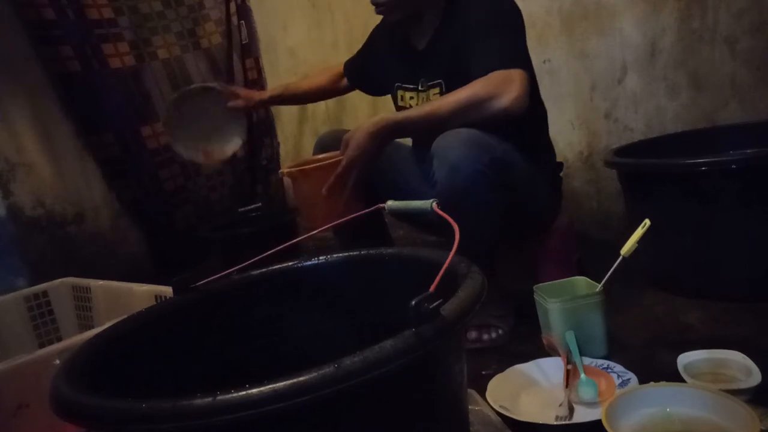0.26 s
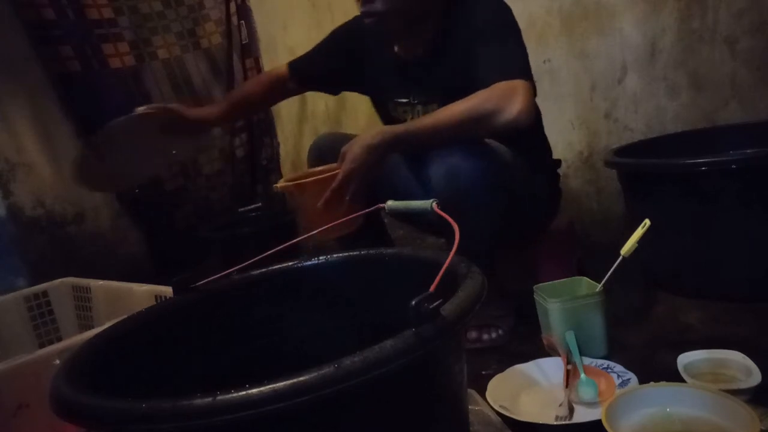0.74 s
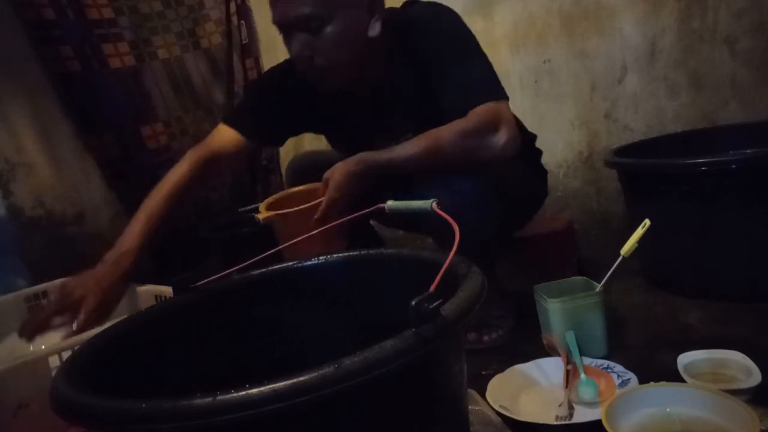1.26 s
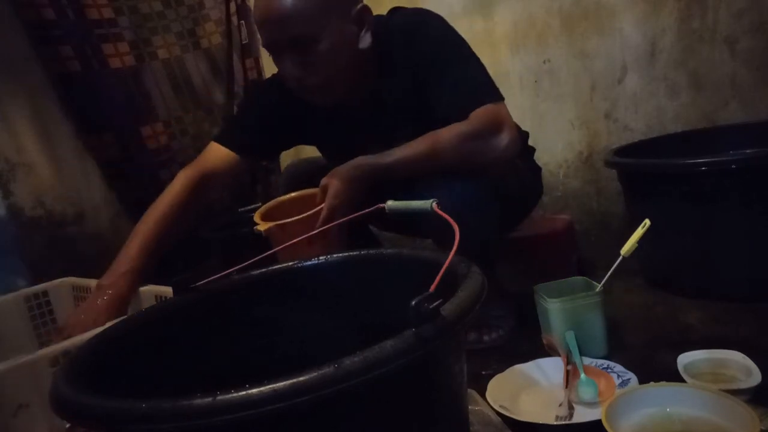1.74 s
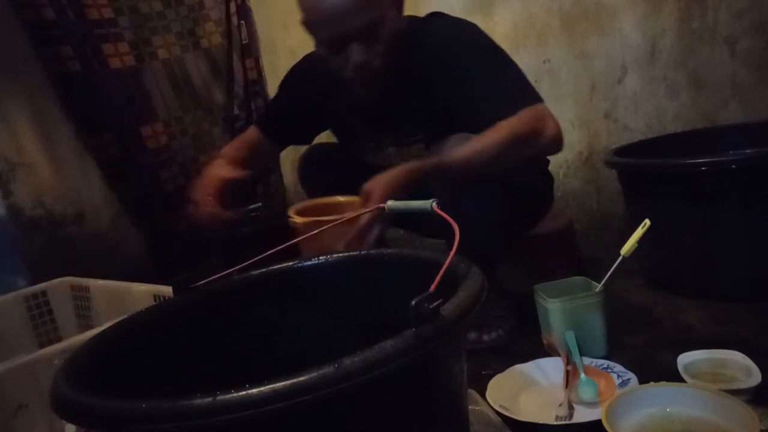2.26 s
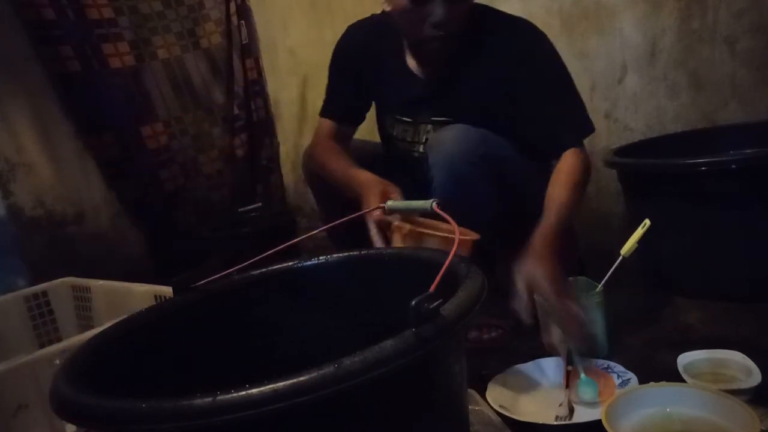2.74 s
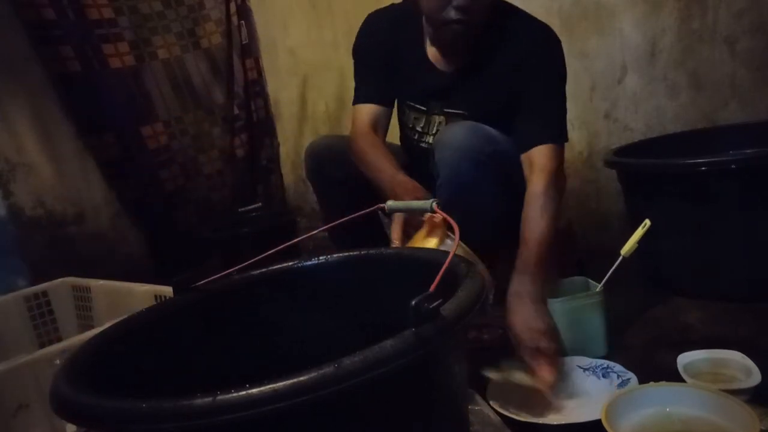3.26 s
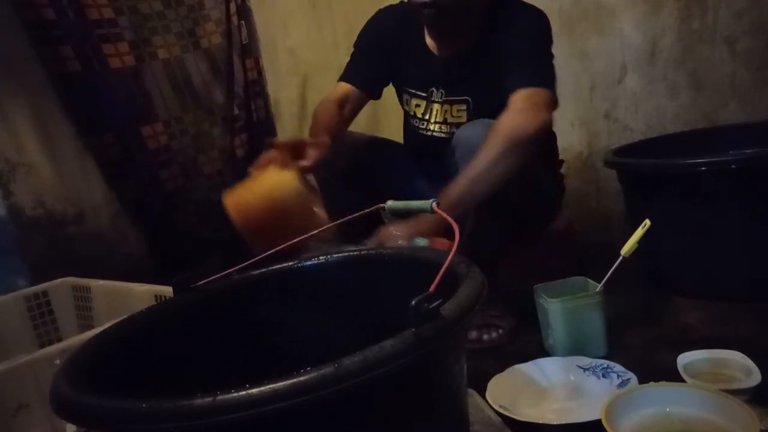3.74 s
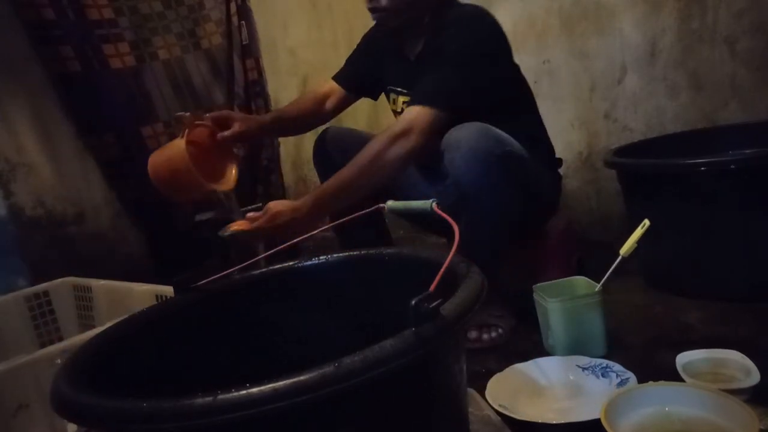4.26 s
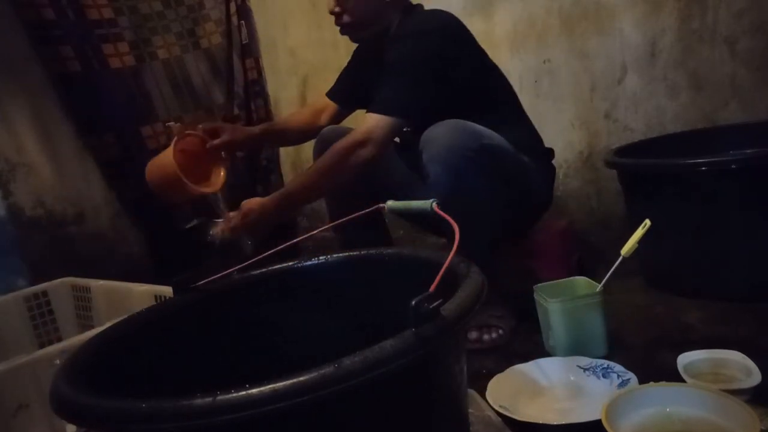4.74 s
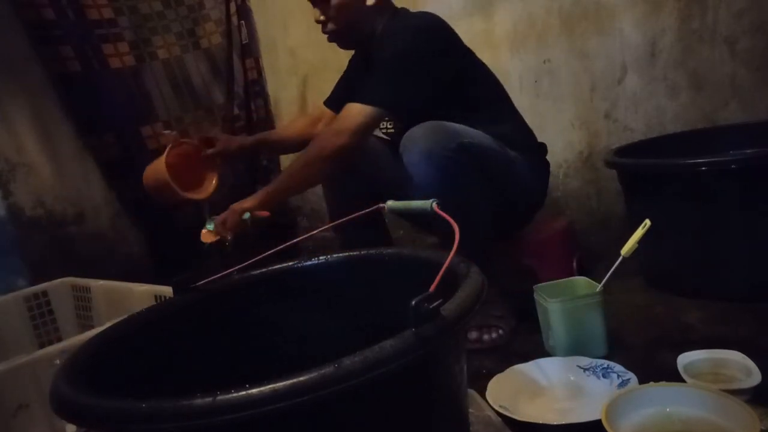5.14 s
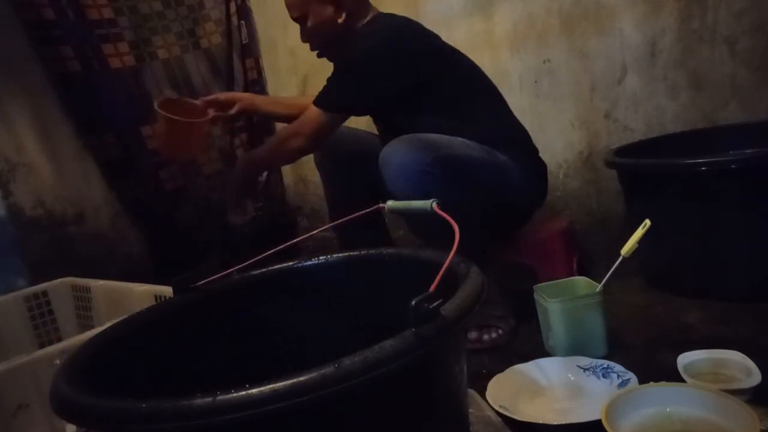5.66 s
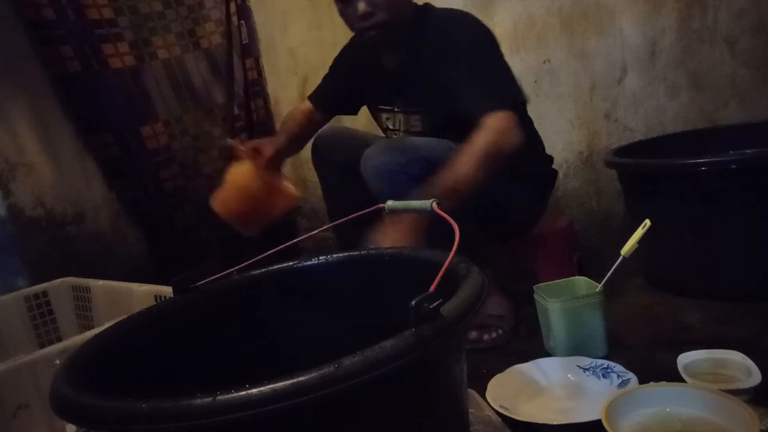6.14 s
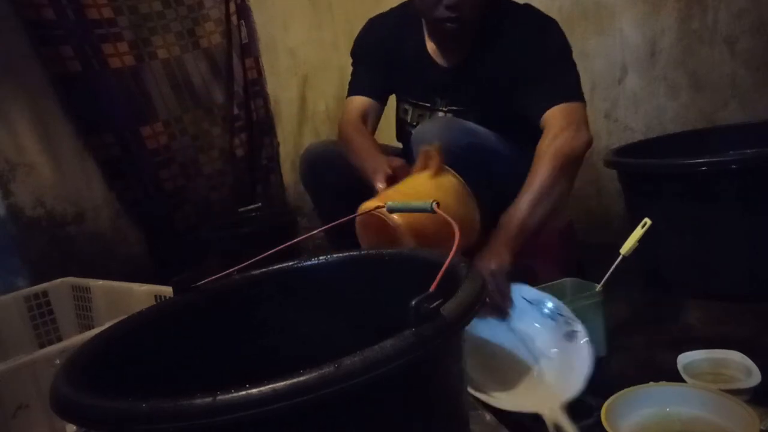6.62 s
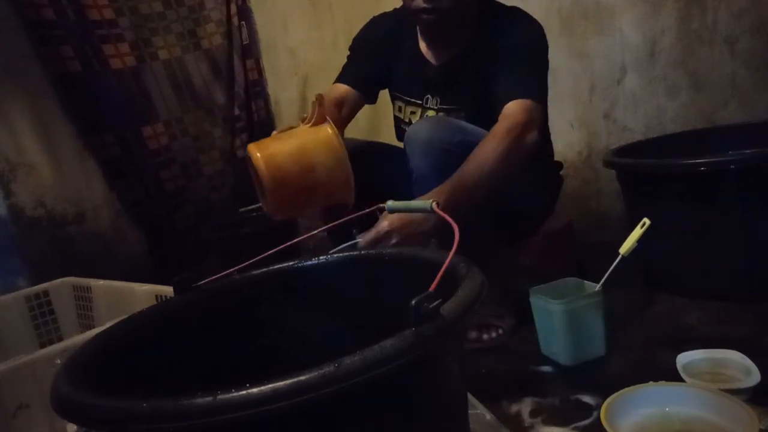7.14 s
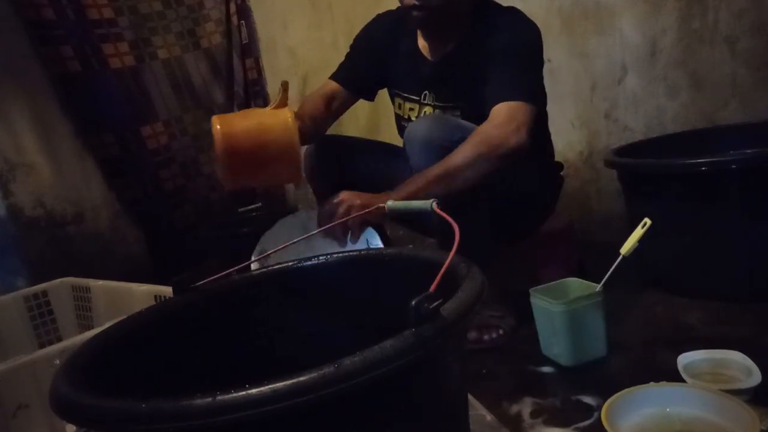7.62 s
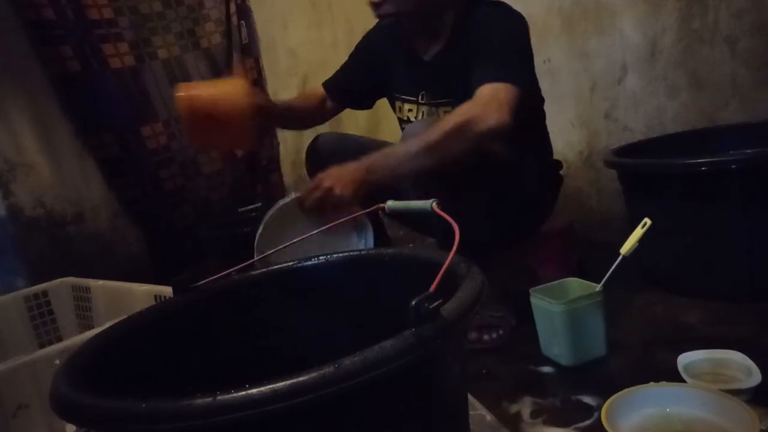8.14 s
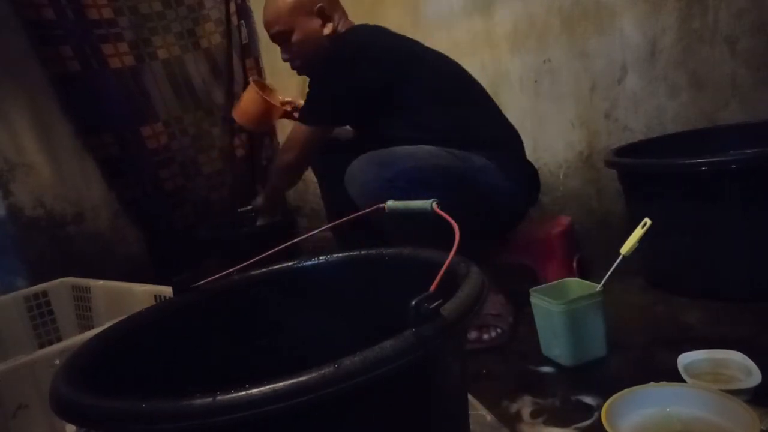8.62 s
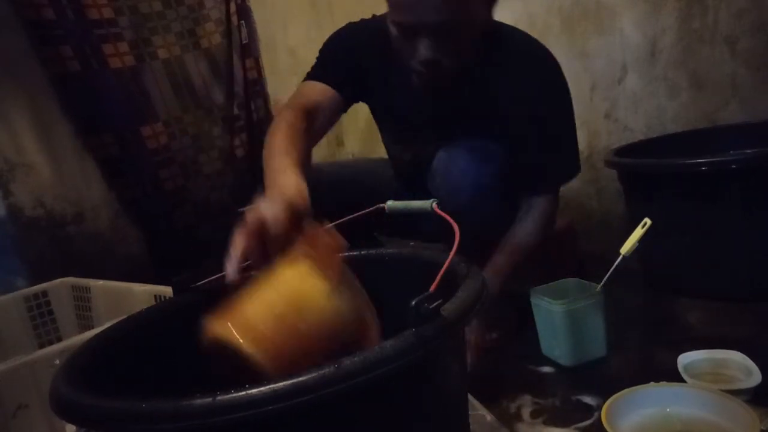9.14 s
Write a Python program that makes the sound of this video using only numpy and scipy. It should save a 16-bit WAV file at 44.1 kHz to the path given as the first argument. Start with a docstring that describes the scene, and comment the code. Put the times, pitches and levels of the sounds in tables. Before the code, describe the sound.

Quiet night hiss, a low drone and a fine trickle sit under close dishwashing sounds. First come crate thuds and ringing clatter, then small metallic spoon clinks, a longer splashy rinse, a short stacking knock, a shorter thinner rinse, and finally plate knocks, dull tub bumps, rubbing and a small water plop. A small creature whistles faintly outside; the bare room adds a brief reverberation.

```python
"""A peep from outside sounds faintly over a steady night hiss, a low drone and a fine trickle on the wet floor.
Then washing up starts in a small bare-walled room: dishes drop into a plastic crate, where one bounces and clatters.
Spoons and a plate are handled, rinsed from a dipper and stacked; a plastic tub is bumped and rubbed.
Contacts are noise bursts that ring an object's modes; water is random drops and bubbles that rise in pitch;
peeps are wavering sines, and the night is filtered noise."""
import sys
import numpy as np
from scipy import signal
from scipy.fft import rfft, irfft
from scipy.io import wavfile
from scipy.ndimage import uniform_filter1d

SR = 44100
rng = np.random.default_rng(int(sys.argv[2]) if len(sys.argv) > 2 else 0)


def wav_record(signal):
    """Record a signal, one row per channel, as 16-bit PCM in the file named by sys.argv[1]."""
    frames = np.transpose(np.atleast_2d(signal))
    bounded = np.clip(frames, -1, 1)
    # unit amplitude maps onto the largest positive 16-bit level
    quanta = np.round(bounded * 32767).astype(np.int16)
    wavfile.write(sys.argv[1], SR, quanta)


N = 413658  # length [samples]

# All tables of blows: (time [s], relative level [dB], bass re level [dB], treble re level [dB], contact time [s]).
# A short contact knocks, a long one scrapes. All colours: (frequency [Hz], relative level per Hz [dB]).
# All modes: (frequency [Hz], relative level [dB], t60 [s]).

# Colour of water drops on the floor: (frequency [Hz], relative level per Hz [dB])
SPATTER_COLOUR = [(150, -38), (800, 17), (1500, 9.5), (3300, 14.5), (7500, 2.5), (16000, -7)]
# Colour of a bright clink: (frequency [Hz], relative level per Hz [dB])
CLINK_COLOUR = [(100, -42), (550, -3), (2500, -15), (16000, 5.5)]
# Ringing of the plate's rim: (frequency [Hz], relative level [dB], t60 [s])
PLATE_RIM_MODES = [(2800, -12, 0.19), (4500, 1, 0.091), (6350, -4, .22), (8100, 8, 0.11), (9300, -2, 0.19),
                   (11250, 1, 0.098)]


def crate_thuds():
    """Dishes land in the plastic crate, whose low modes give the thud its body."""
    # Blows on the crate, columns as above
    thuds = [(0.911, -33.5, -17, -24, 0.015), (0.969, -17.5, -3, -28.5, 0.0032),
             (1.005, -15.5, -9, -41, 0.0021), (2.194, -31.5, -3, -26, 0.0024),
             (2.488, -37, -19.5, -33, 0.0013)]
    # Colour of the thud: (frequency [Hz], relative level per Hz [dB])
    colour = [(50, -45), (130, -4), (270, -7.5), (500, 2.5), (800, -5), (1100, -6.5), (3300, -14),
              (16000, -23)]
    # Ringing of the crate: (frequency [Hz], relative level [dB], t60 [s])
    modes = [(209, -8, 0.27), (366, -4, 0.3), (498, 2.5, 0.22), (785, 4, 0.12)]
    return blows(thuds, colour, modes, ring_db=-3, wet_db=3, level_db=0.5, crest_db=16.5)


def clatter():
    """A dish bounces in the crate; each place of contact brings out other modes."""
    # Bounces, columns as above, then (favoured pitch [Hz], extra ring [dB])
    bounces = [(1.313, -6, -29, -24, 0.0032, 1940, -4), (1.444, -12, -25.5, -26.5, 0.0068, 2250, 0.5),
               (1.555, -13, -25, -30.5, 0.013, 2980, -3), (1.663, -10, -26, -28.5, 0.0022, 810, 1.5),
               (1.873, -23.5, -15, -29.5, 0.015, 815, 1), (1.919, -23, -26, -45, 0.0023, 815, 10),
               (1.966, -14, -17, -25, 0.014, 810, 2), (1.979, -3, -25, -17, 0.01, 3500, -6),
               (2.27, -31.5, -23, -27, 0.002, 3040, -5)]
    # Colour of the contact: (frequency [Hz], relative level per Hz [dB])
    colour = [(50, -12), (150, -19.5), (750, 3), (1250, -1.5), (2000, 2), (7500, 0.5), (16000, -12.5)]
    # Ringing of the dish: (frequency [Hz], relative level [dB], t60 [s])
    modes = [(810, 8, 0.31), (990, 8, 0.57), (1520, 1, 0.59), (1860, 3.5, 0.26), (2155, 11.5, 0.13),
             (2340, 7.5, 0.14), (3060, 1, 0.13), (3970, 5, 0.31)]
    return blows(bounces, colour, modes, ring_db=-8.5, wet_db=7, level_db=-0.5, crest_db=14.5)


def spoons():
    """Spoons knock and scrape on a dish with a dull ring, and clink with high metal modes."""
    # Knocks and scrapes of the spoons, columns as above
    contacts = [(2.9, -16, -12, -22, 0.025), (2.936, -20.5, -3.5, -16, 0.0075),
                (2.981, -11, -10.5, -24, 0.0045), (3.064, -23, -10, -9, 0.0025),
                (3.16, -17.5, -25, -11, 0.023), (3.202, -17.5, -29, -6.5, 0.0023),
                (3.208, -15.5, -31, -16, 0.0095)]
    # Colour of these contacts: (frequency [Hz], relative level per Hz [dB])
    contact_colour = [(100, -38), (400, -21), (620, -2.5), (1100, -11.5), (3500, -16), (16000, -48)]
    # Ringing of a dish: (frequency [Hz], relative level [dB], t60 [s])
    dish_modes = [(610, 12, 0.062), (2100, -4, 0.14)]
    # Clinks of the spoons, columns as above
    clinks = [(3.025, -24, -46, -4.5, 0.00099), (3.052, -24.5, -40, -20, 0.0016),
              (3.122, -25.5, -19.5, -36, 0.001)]
    # Ringing of a spoon: (frequency [Hz], relative level [dB], t60 [s])
    spoon_modes = [(6400, -9, 0.11), (7050, -6, 0.22), (8000, 0, 0.18), (8650, 2, 0.099), (11900, -6, 0.12),
                   (13590, -15, .15)]
    on_dish = blows(contacts, contact_colour, dish_modes, ring_db=-2, wet_db=2, level_db=-16, crest_db=12)
    return on_dish + blows(clinks, CLINK_COLOUR, spoon_modes,
                           ring_db=-3.5, wet_db=13, level_db=-9.5, crest_db=9.5)


def stacking():
    """Stacked dishes knock and slide together, with mostly short rings."""
    # Contacts in the stack, columns as above
    contacts = [(5.757, -24, -10, -23, 0.0047), (5.766, -13.5, -9, -28, 0.0016),
                (5.857, -21.5, -46, -17.5, 0.023), (5.921, -17, -20, -28, 0.021),
                (5.941, -11.5, -16, -29, 0.019), (6.003, -21, -24, -22, 0.023),
                (6.049, -23.5, -16, -25, 0.0034)]
    # Colour of the contact: (frequency [Hz], relative level per Hz [dB])
    colour = [(50, -41), (150, -28), (600, -16), (1050, -3.5), (1700, -1.5), (3800, -6), (16000, -22)]
    # Ringing of the stack: (frequency [Hz], relative level [dB], t60 [s])
    modes = [(1034, 9, 0.051), (1140, 11, 0.041), (2060, -4, 0.25), (2140, -5.5, 0.29), (8750, -15, 0.37)]
    return blows(contacts, colour, modes, ring_db=-7.5, wet_db=-0.5, level_db=-3, crest_db=16.5)


def plate():
    """The plate drags with hardly any ring, clinks at its rim and knocks with its body modes."""
    # Drags of the plate, columns as above
    drags = [(6.222, -33.5, -10.5, -30, 0.013), (6.411, -37.5, 0, -18.5, 0.015),
             (6.433, -33.5, -6, -36, 0.0079), (6.45, -38.5, -6.5, -13.5, 0.0042),
             (6.573, -40, -6.5, -21, 0.013), (8.522, -38, -11.5, -26, 0.014)]
    # Colour of a drag: (frequency [Hz], relative level per Hz [dB])
    drag_colour = [(50, -30), (250, -22.5), (650, -7.5), (1200, -4.5), (3000, -12), (16000, -38)]
    # Clinks of the rim, columns as above
    clinks = [(6.421, -38, -25, -8, 0.002), (6.451, -37, -25, -13, 0.0011), (6.514, -39, -25, -16, 0.002),
              (6.665, -61.5, -20, 15, 0.00066), (6.713, -57, -31, 4, .0009)]
    # Knocks, columns as above, then (favoured pitch [Hz], extra ring [dB])
    knocks = [(7.381, -33.5, -47, -25, 0.017, 1868, -2.5), (8.695, -30, -9, -13, 0.0052, 3830, -5),
              (8.786, -33, -10, -18, 0.017, 3500, -15), (8.802, -23, -9.5, -15.5, 0.0056, 4020, -2),
              (8.814, -21, -21, -40, 0.011, 3058, 4.5), (8.842, -26, -33, -29, 0.0015, 1320, 9)]
    # Colour of a knock: (frequency [Hz], relative level per Hz [dB])
    knock_colour = [(50, -1), (150, -9), (900, -5), (2000, -12.5), (3600, -5), (6000, -9), (16000, -30)]
    # Ringing of the body: (frequency [Hz], relative level [dB], t60 [s])
    body_modes = [(436, 0, 0.076), (898, 3.5, 0.1), (1350, -14, 0.067), (1868, -20, 0.13),
                  (3058, -4.5, 0.052), (3830, -8, 0.058), (4020, -12, 0.038)]
    out = blows(drags, drag_colour, PLATE_RIM_MODES, ring_db=-29, wet_db=-6.5, level_db=2.5, crest_db=16.5)
    out += blows(clinks, CLINK_COLOUR, PLATE_RIM_MODES, ring_db=-1, wet_db=-2, level_db=-8, crest_db=13)
    out += blows(knocks, knock_colour, body_modes, ring_db=-1.5, wet_db=2.5, level_db=-3.5, crest_db=5.5)
    return out


def tub():
    """The big plastic tub: dull bumps ring its wall, and uneven slips of dragging plastic make it rumble."""
    # Bumps against the tub, columns as above
    bumps = [(8.618, -31.5, -2.5, -22, 0.019), (8.864, -17, -6.5, -26.5, 0.012),
             (9.2, -28, -12.5, -20.5, 0.018)]
    # Colour of the plastic: (frequency [Hz], relative level per Hz [dB])
    colour = [(50, -10), (120, -4), (400, 2.5), (600, 1), (1000, 2.5), (3300, -11.5), (16000, -39)]
    # Ringing of the tub: (frequency [Hz], relative level [dB], t60 [s])
    modes = [(119, 2.5, 0.25), (373, 5, 0.19), (1270, 4.4, 0.14)]
    # Rubbing strokes: (time [s], length [s], relative level [dB])
    rubs = [(8.585, 0.25, -50.5), (8.869, 0.156, -47), (9.005, 0.38, -52)]
    # Wall resonance excited by rubbing: (frequency [Hz], width [Hz], level re slips [dB])
    wall = (406, 52, 0.9)
    bumping = blows(bumps, colour, modes, ring_db=-7.5, wet_db=-9.5, level_db=-8, crest_db=12)
    stroke = np.zeros(N)
    for s, length, db in rubs:
        add(stroke, s, amp(db) * signal.windows.tukey(round(length * SR), .5))
    slips = drops(per_s=1300, spread_db=7) * amp(4.7 * wander(0.02))
    slips = through(slips, click(colour))
    rumble = slips / rms(slips) + resonate(slips, *wall)
    return bumping + through(stroke * rumble, room(wet_db=-4))


def pouring():
    """Drops spatter, trap tiny bubbles and ring hollows; spray fizzes above and a thick stream gurgles below."""
    # Hollows that the falling water keeps ringing: (frequency [Hz], width [Hz], level re stream [dB])
    hollows = [(880, 100, -17.5), (1117, 150, -19)]
    # Colour of the gurgle: (frequency [Hz], relative level per Hz [dB])
    gurgle_colour = [(120, 9), (250, -3), (400, 4.5), (780, 14), (1100, 10.5)]
    impacts = through(drops(per_s=950, spread_db=1.5), click(SPATTER_COLOUR))
    _, patter, spray = bands(impacts, low_hz=1220, high_hz=4800)

    tiny = bubbles(per_s=520, low_hz=1400, high_hz=4600, cycles=11, rise=0.035, spread_db=3.5, bunch_db=5)
    spatter = patter / rms(patter) + amp(5) * tiny
    fizz = bubbles(per_s=700, low_hz=5500, high_hz=11600, cycles=20, rise=0.011,
                   spread_db=2, bunch_db=6, count=12)
    spray = spray / rms(spray) + amp(-9) * fizz
    gurgle = bubbles(per_s=1200, low_hz=124, high_hz=1310, cycles=3.83, rise=0.059,
                     spread_db=-2, bunch_db=1.5)
    gurgle = through(gurgle, click(gurgle_colour))

    # the gurgle needs a thick stream; the spray lingers in a thin one
    stream = flow(layer=0, power=0.64)
    water = amp(-4) * stream * spatter / rms(spatter)
    water += amp(-1.5) * flow(layer=1, power=2.22) * gurgle / rms(gurgle)
    water = slosh(water) + amp(-0.5) * flow(layer=2, power=0.31) * spray / rms(spray)
    for hz, width, db in hollows:
        water += stream * resonate(impacts, hz, width, db)
    return through(water, room(wet_db=-3))


def flow(layer, power):
    """Strength of one layer of the water: each gush starts abruptly, swells, thins out and stops."""
    # Tips of the dipper, first over the spoons, then over the plate: (time [s], time to crest [s], length [s],
    # then relative crest levels: spatter [dB], gurgle [dB], fine spray [dB])
    gushes = [(3.628, 0.016, 1, -40, -49.5, -47.5), (3.958, 0.15, 0.61, -50.5, -35.5, -42),
              (4.541, 0.23, 0.33, -40, -55, -42.5), (4.909, 0.1, 0.16, -38, -44, -38.5),
              (5.012, 0.23, 0.38, -33.5, -38.5, -42), (5.359, 0.022, 0.28, -38.5, -37, -44.5),
              (6.894, 0.012, 0.19, -43.5, -42.5, -44), (7.546, 0.044, 0.15, -49, -52, -50.5),
              (7.84, 0.035, 0.4, -42.5, -58, -44.5)]
    attack_s, release_s = 0.008, 0.0032
    swell_db, thinning_db = 3, 13.5  # before each layer's power scales them
    out, t = np.zeros(N), np.arange(SR) / SR
    for start, crest, length, *levels_db in gushes:
        arch_db = np.interp(t, [0, crest, max(length, crest)], [-swell_db, 0, -thinning_db])
        gate = np.minimum(t / attack_s, 1) * np.exp(-np.maximum(t - length, 0) / release_s)
        add(out, start, gate * amp(levels_db[layer] + power * arch_db))
    return out


def slosh(water):
    """The stream leaves the rim in uneven lumps, and each lump splashes in its own range of pitch."""
    depth_db, lump_s, lump_hz = 3, 0.03, 900
    hz, t, z = signal.stft(water, SR, nperseg=256)
    lumps = uniform_filter1d(rng.standard_normal(z.shape), round(lump_hz / hz[1]), axis=0)
    lumps = uniform_filter1d(lumps, round(lump_s / t[1]), axis=1)
    gain = amp(depth_db * lumps / rms(lumps))
    return signal.istft(z * gain / rms(gain), SR, nperseg=256)[1][:N]


def gulps(count=2):
    """A trapped pocket of air wobbles, settles and glides up in pitch; short-lived bubbles break off around it."""
    # Single bubbles, from low plops to high drips: (time [s], level [dB], pitch [Hz])
    pockets = [(2.422, -33.5, 755), (3.668, -31, 3340), (3.965, -38, 630), (4.051, -28, 394),
               (4.045, -29, 694), (4.085, -29.5, 856), (4.155, -39, 710), (4.454, -28.5, 3490),
               (4.53, -24.5, 884), (4.64, -25.5, 3960), (4.664, -29, 2810), (5.028, -20, 3600),
               (5.261, -23, 4500), (5.385, -32.5, 1960), (5.476, -30, 2070), (6.954, -40, 468),
               (7.19, -39, 3060), (7.564, -33.5, 3190), (7.665, -41, 2100), (7.884, -28.5, 3500),
               (7.951, -31, 3200), (8.078, -37.5, 710), (9.242, -34.5, 765), (9.311, -38, 1118)]
    ring_s, ring_power = 0.08, 0.48  # t60 at 1 kHz, and how fast it shortens with pitch
    rise, wobble_share, settle_s = 0.08, 0.071, 0.033  # rise and wobble are shares of the pitch
    offshoot_db, offshoot_s, offshoot_spread = -6.5, 0.036, 0.238  # level re gulp, life, share of its pitch
    out, t = np.zeros(N), np.arange(SR // 2) / SR
    onset = 1 - np.exp(-t / 0.00083)
    for s, db, hz in pockets:
        t60 = ring_s * (hz / 1000) ** -ring_power
        wobble = wobble_share * wander(0.00278, size=len(t)) * np.exp(-t / settle_s)
        glide = rise * (np.minimum(2 * t / t60, 2) - .5)
        turns = np.cumsum(hz * (1 + glide + wobble)) / SR
        add(out, s, amp(db - 60 * t / t60) * onset * np.sin(2 * np.pi * turns))
        for late, detune in rng.random((count, 2)):
            ratio = 1 + offshoot_spread * (2 * detune - 1)
            envelope = amp(db + offshoot_db - 60 * t / offshoot_s) * onset
            add(out, s + late * offshoot_s, envelope * np.sin(2 * np.pi * turns * ratio))
    return through(out, room(wet_db=0))


def water_slaps():
    """Fat drops land, and at the end the dipper hits the water; each slap is short and rings nothing."""
    # Water slaps: (time [s], relative level [dB], treble re level [dB])
    slaps = [(3.663, -38.5, -21), (4.009, -31.5, -25.5), (4.158, -31, -24), (4.744, -36.5, -15),
             (5.155, -26.5, -25.5), (7.023, -39.5, -37), (7.124, -38, -23.5), (7.697, -46.5, -10.5),
             (7.801, -33.5, -22), (7.96, -30, -31), (8.071, -33, -27.5), (9.277, -41, -22.5)]
    bass_db, contact_s = -47, 0.0065
    rows = [(s, db, bass_db, treble_db, contact_s) for s, db, treble_db in slaps]
    return blows(rows, SPATTER_COLOUR, [], ring_db=0, wet_db=-1.5, level_db=11.5, crest_db=23.5)


def spoon_rings():
    """A spoon nudged by the rinsing sings one steady, dying note."""
    # Faint notes: (time [s], level [dB], pitch [Hz], t60 [s])
    notes = [(4.55, -41, 807, 0.48), (4.686, -41, 1106, 0.98), (5.04, -30.5, 798, 0.22),
             (5.352, -26, 789, 0.19)]
    out, t = np.zeros(N), np.arange(SR) / SR
    for s, db, hz, t60 in notes:
        add(out, s, amp(db - 60 * t / t60) * np.sin(2 * np.pi * hz * t))
    return through(out, room(wet_db=0))


def trickle():
    """Water running off the wet floor: the treble of many small drops makes a faint, fine crackle."""
    # Level of the runoff: (time [s], level [dB])
    runoff = [(0, -57), (2.5, -66.5), (3.5, -51), (5.7, -55), (6.3, -80), (9.38, -59)]
    impacts = through(drops(per_s=750, spread_db=4), click(SPATTER_COLOUR))
    crackle = bands(impacts, high_hz=3500)[2]
    level = amp(np.interp(np.arange(N) / SR, *np.transpose(runoff)))
    return through(level * crackle / rms(crackle), room(wet_db=0.5))


def peeps(pitch_hz=2800, length=0.11):
    """A small creature outside: short whistles around one pitch, with a flutter, blurred by echoes."""
    # Whistles: (time [s], level [dB])
    calls = [(0, -52.5), (0.716, -44), (2.56, -50), (3.853, -41), (4.49, -45), (5.351, -42), (6.129, -45.5),
             (6.52, -49.5), (6.95, -48), (7.53, -52), (8.34, -49.5), (9.097, -45)]
    waver = 0.032  # share of the pitch
    out, t = np.zeros(N), np.arange(round(length * SR)) / SR
    for s, db in calls:
        hz = pitch_hz * (1 + waver * wander(0.0025, size=len(t)))
        whistle = signal.windows.tukey(len(t), .7) * np.sin(2 * np.pi * np.cumsum(hz) / SR)
        add(out, s, amp(db) * whistle)
    return through(out, room(wet_db=-1))


def night():
    """A low drone and faint air from shaped noise, with narrow bands of steady hiss."""
    # Colour of the night air: (frequency [Hz], relative level per Hz [dB])
    air = [(25, 12), (75, -8.5), (103, 6.5), (135, 3.5), (220, -10), (500, -13), (850, -10), (1600, -17.5),
           (3400, -19.5), (5000, -32), (7500, -32), (9000, -16.5), (10200, -34), (16000, -32)]
    # Narrow hiss: (frequency [Hz], width [Hz], level [dB])
    hiss_bands = [(2330, 200, -60.5), (7080, 850, -63), (7585, 460, -56.5)]
    hz = np.fft.rfftfreq(N, 1 / SR)

    def noise(shape):
        x = irfft(rfft(rng.standard_normal(N)) * shape, N)
        return x / rms(x)

    hiss = sum(amp(db) * noise(1 / (1 + ((hz - f) / (width / 2)) ** 2)) for f, width, db in hiss_bands)
    return amp(-49.5) * noise(amp(read(air, hz))) + hiss


def blows(rows, colour, modes, ring_db, wet_db, level_db, crest_db):
    """Each blow chatters briefly, sounds in the room and sets the object's modes ringing."""
    favour_db, favour_octaves = 18.5, 0.21  # lift of the modes that a blow favours, and its reach in pitch
    rattle_db, rattle_s = 3, 0.007
    out, response = np.zeros(N), through(room(wet_db), click(colour))
    t, attack = np.arange(len(response)) / SR, slice(0, round(0.09 * SR))
    for s, peak_db, bass_db, treble_db, contact, *place in rows:
        # the surfaces press together quickly, then let go
        pressure = np.exp(-t / contact) * (1 - np.exp(-t / (0.54 * contact)))
        chatter = rng.standard_normal(len(t)) * (rng.random(len(t)) < .15) * pressure
        sound = unit(through(chatter, response))
        if len(modes):
            # the place of contact favours the modes near one pitch; without a place, none is lifted
            favoured_hz, extra_db = place or (1, 0)
            ring = np.zeros(len(t))
            for hz, db, t60 in modes:
                lift_db = favour_db * np.exp(-(np.log2(hz / favoured_hz) / favour_octaves) ** 2)
                gain = amp(db + lift_db + rng.standard_normal())
                decay = np.exp(-np.log(1000) * t / t60)
                ring += gain * decay * np.sin(2 * np.pi * (hz * t + rng.random()))
            # the object rocks as it rings, which roughens its tone
            ring = ring * amp(rattle_db * wander(rattle_s, size=len(t)))
            sound = sound + amp(ring_db + extra_db) * unit(ring * (1 - np.exp(-t / contact)))
        # weight and hardness set bass and treble; the middle band lies crest_db under the blow's level
        weights = amp(level_db + peak_db + np.array([bass_db, -crest_db, treble_db]))
        add(out, s, sum(w * part / rms(part[attack]) for w, part in zip(weights, bands(sound))))
    return out


def drops(per_s, spread_db, count=30000):
    """A random train of impacts of varied size; a positive spread makes most small and a few large."""
    size = amp(spread_db * np.minimum(rng.exponential(1, count), 4)) * rng.choice([-1, 1], count)
    falls = rng.random(count) < per_s * N / SR / count
    return np.bincount(rng.integers(0, N, count), size * falls, N)


def bubbles(per_s, low_hz, high_hz, cycles, rise, spread_db, bunch_db, count=24):
    """Bubbles of many sizes, like sizes in bunches; each rings for some cycles, rising in pitch as it surfaces."""
    out = np.zeros(N)
    pitches = np.geomspace(low_hz, high_hz, count) * rng.uniform(1.0, 1.05, count)
    for like_sizes in pitches.reshape(-1, 3):
        bunch = amp(bunch_db * np.minimum(wander(0.028), 1.5))
        for hz in like_sizes:
            life = cycles / hz
            t = np.arange(0, 5 * life, 1 / SR)
            ring = unit(np.exp(-t / life) * np.sin(2 * np.pi * hz * t * (1 + rise * t / life)))
            out += through(drops(per_s / count, spread_db) * bunch, ring)
    return out / rms(out)


def click(colour, size=4096):
    """The sharpest causal (minimum-phase) pulse with this colour, heard through the microphone's port."""
    # The port's dip and then peak in the treble: (frequency [Hz], gain [dB])
    port = [(4100, -1.5), (4900, -8), (6200, -1), (7600, 7.5), (9000, -0.5), (10500, -4.5)]
    hz = abs(np.fft.fftfreq(size, 1 / SR))
    log_gain = np.log(amp(read(colour, hz) + read(port, hz)))
    return unit(np.fft.ifft(np.exp(signal.hilbert(log_gain).conj())).real[:size // 2])


def room(wet_db):
    """The direct sound, then scattered wall echoes that die slowest in the bass."""
    # Reverberation of the bare walls: (frequency [Hz], t60 [s])
    decay_times = [(120, 0.69), (500, 0.32), (1500, 0.39), (4000, 0.28), (8000, 0.26), (15000, 0.3)]
    t = np.arange(SR // 2) / SR
    taps = rng.standard_normal(len(t)) * (rng.random(len(t)) < .15) * (t > .0015)
    hz, at, z = signal.stft(taps, SR, nperseg=256)
    decay = amp(-60 * at / read(decay_times, hz)[:, None])
    tail = signal.istft(z * decay, SR, nperseg=256)[1][:len(t)]
    return unit((t == 0) + amp(wet_db) * unit(tail))


def resonate(x, hz, width, db):
    """What one resonance picks out of x, at the level db."""
    ring = signal.lfilter(*signal.iirpeak(hz, hz / width, SR), x)
    return amp(db) * ring / rms(ring)


def bands(x, low_hz=700, high_hz=5000):
    """Bass, middle and treble, split by doubled second-order crossover filters."""
    def side(v, hz, kind):
        sos = signal.butter(2, hz, kind, fs=SR, output="sos")
        return signal.sosfilt(np.vstack([sos, sos]), v)
    upper = side(x, low_hz, "high")
    return side(x, low_hz, "low"), side(upper, high_hz, "low"), side(upper, high_hz, "high")


def wander(step_s, size=N):
    """A random curve that heads for a new value every step_s seconds."""
    at = np.arange(size) / SR / step_s
    return np.interp(at, np.arange(5000), rng.standard_normal(5000))


def amp(db):
    """Decibels to gain."""
    return 10 ** (np.asarray(db) / 20)


def rms(x):
    """Root mean square."""
    return np.sqrt(np.mean(x ** 2) + 1e-20)


def unit(x):
    """Scaled to an energy of 1."""
    return x / (np.linalg.norm(x) + 1e-12)


def read(points, hz):
    """A table of (frequency [Hz], value) read on a log-frequency axis."""
    f, value = np.transpose(points)
    return np.interp(np.log(hz + 1), np.log(f + 1), value)


def add(mix, s, sound):
    """Mixes a sound in at time s."""
    part = mix[max(round(s * SR), 0):][:len(sound)]
    part += sound[:len(part)]


def through(x, response):
    """Convolution, cut to the length of x."""
    return signal.oaconvolve(x, response)[:len(x)]


def scene():
    """Dishes, water and the night outside."""
    dishes = crate_thuds() + clatter() + spoons() + stacking() + plate() + tub()
    water = pouring() + gulps() + water_slaps() + spoon_rings() + trickle()
    return (dishes + water + peeps() + night())[None]


def record(dry):
    """The recorder's bass cut, soft overload and band limit."""
    overload, cutoff_hz = 0.9, 15950  # overload is the sample value at which it saturates
    lean = signal.sosfilt(signal.butter(3, 85, "high", fs=SR, output="sos"), dry)
    rounded = overload * np.tanh(lean / overload)
    band_limit = signal.firwin(511, cutoff_hz, window=("kaiser", 9), fs=SR)
    return signal.oaconvolve(rounded, band_limit[None], "same")


dry = scene()
out = record(dry)
wav_record(out)
```